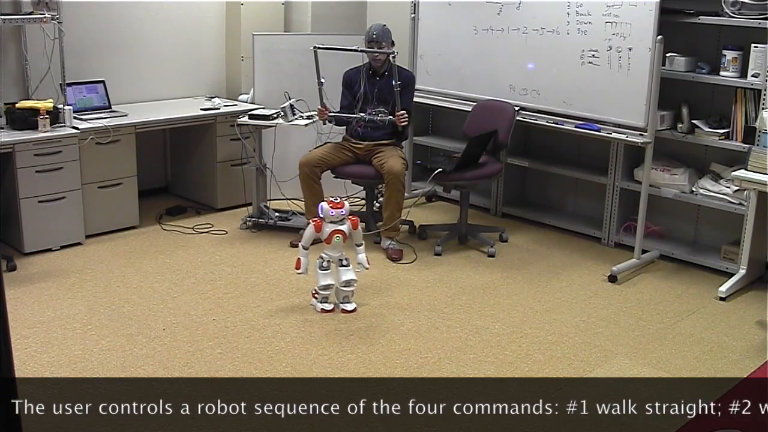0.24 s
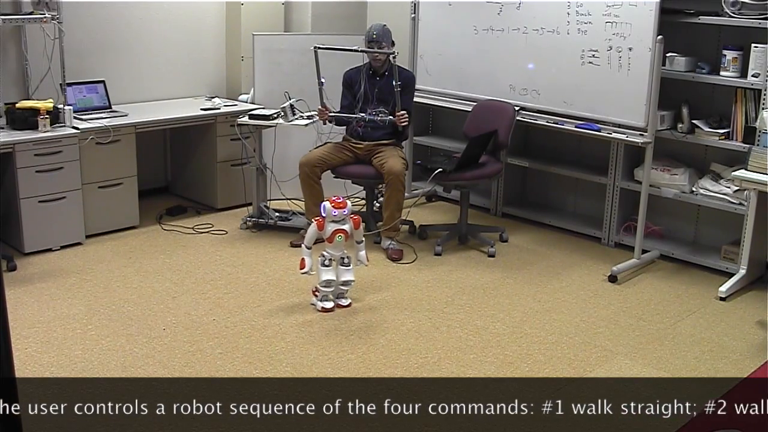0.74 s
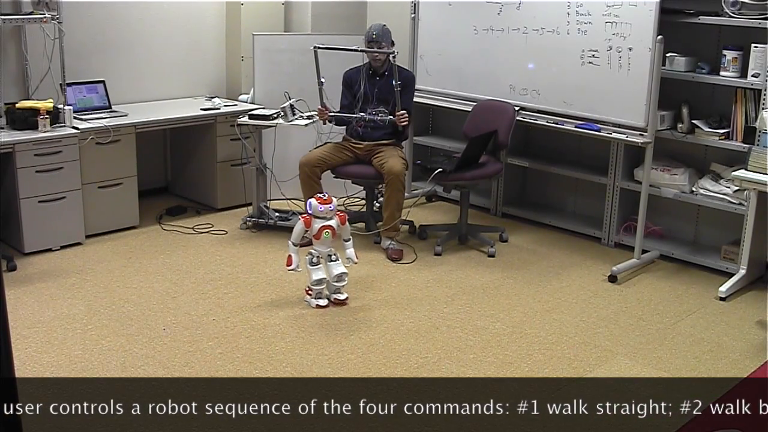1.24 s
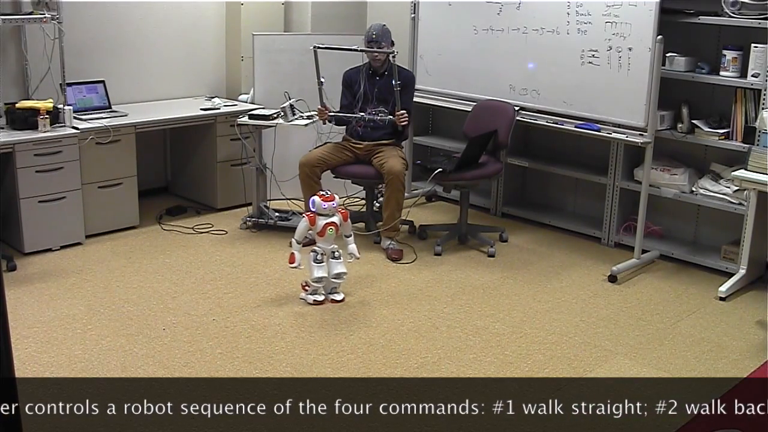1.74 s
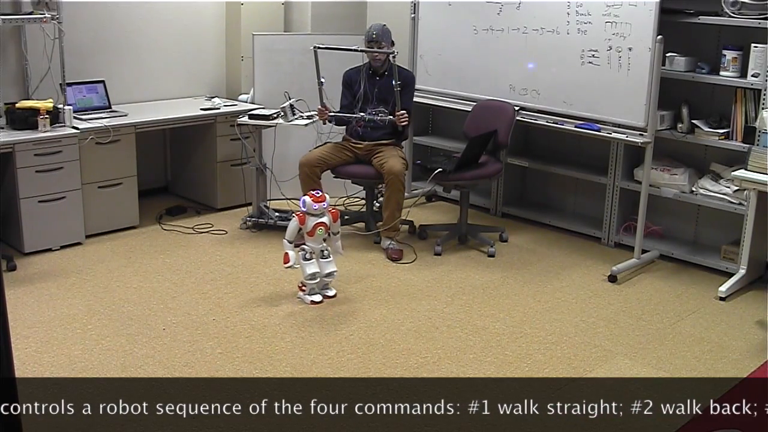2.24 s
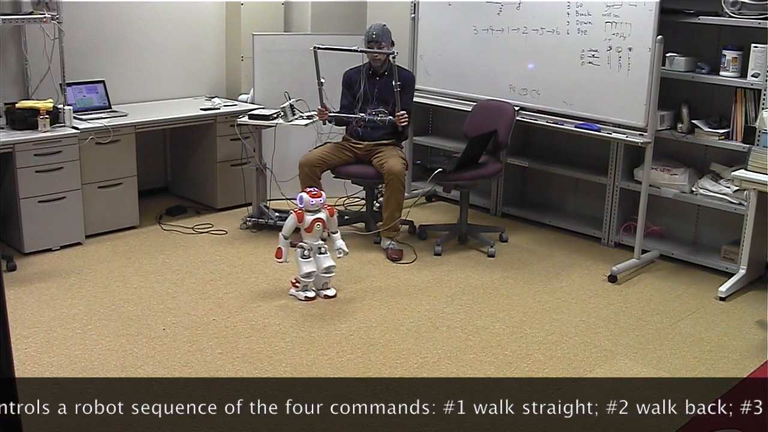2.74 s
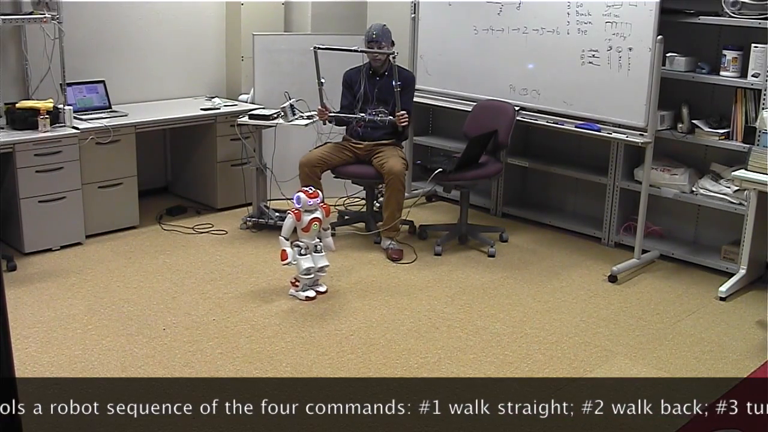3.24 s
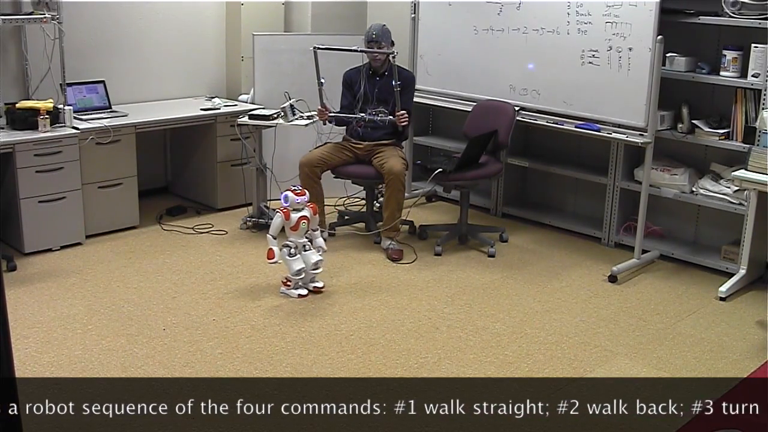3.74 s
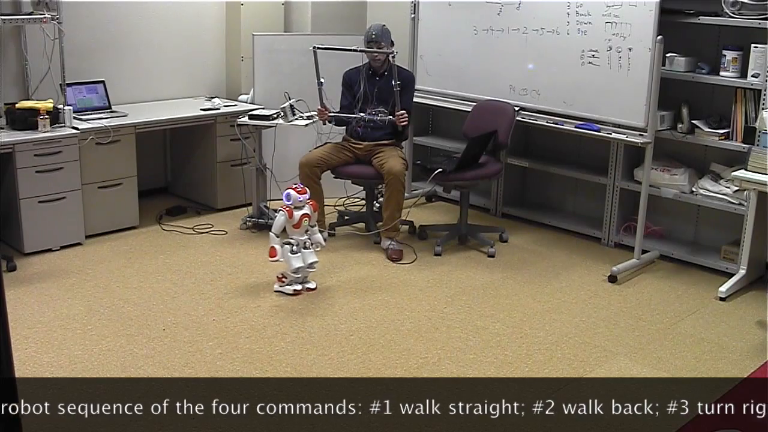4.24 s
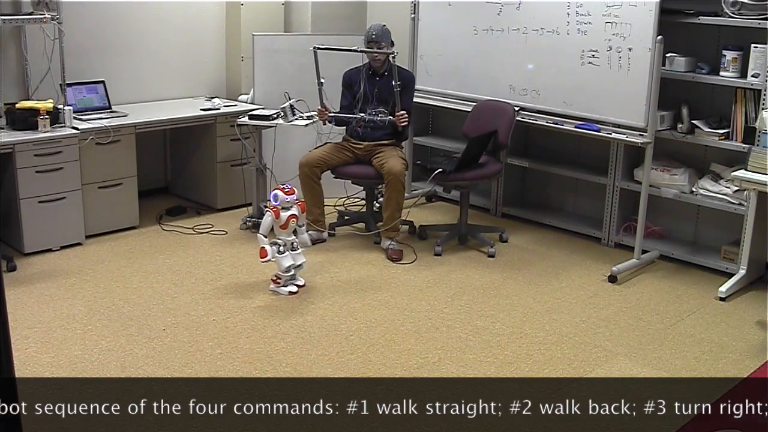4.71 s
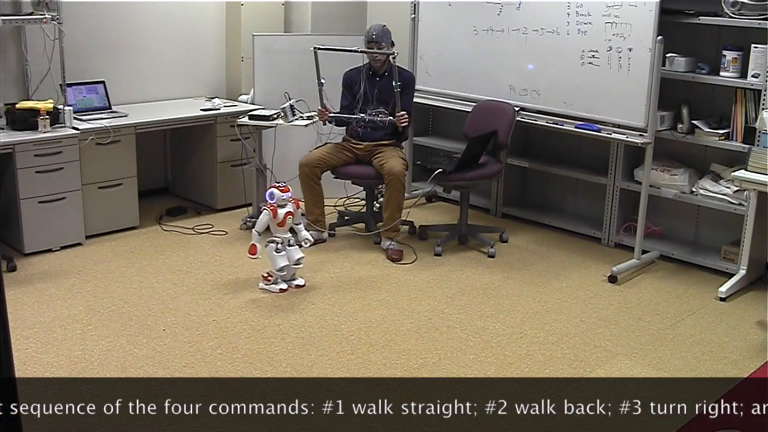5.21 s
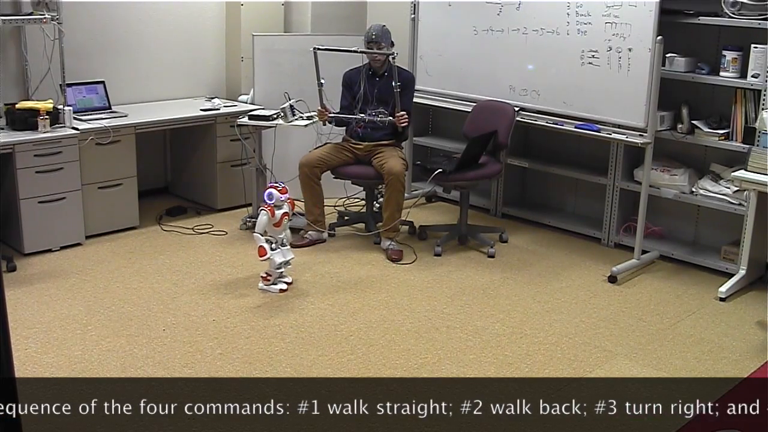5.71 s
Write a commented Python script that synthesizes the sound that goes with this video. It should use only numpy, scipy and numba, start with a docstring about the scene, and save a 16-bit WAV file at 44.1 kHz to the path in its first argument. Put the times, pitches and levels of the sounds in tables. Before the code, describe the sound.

Busy, dry gear noise from a toy-sized walking robot: nasal plastic grinding, irregular clacks and rattles, quick thin whines on each leg swing, then clunks and soft thuds as feet settle. The pattern repeats roughly every 0.8 seconds and is still going at the end. Small damped room, quiet background hiss, almost mono pickup with the very top cut.

```python
"""Furnished room, hard floor: a small plastic humanoid robot shuffles along.
Random tooth contacts through shell and gear resonances make its grind, jolts, squeals and whirs.
Two meshing tones whine on the swings; swept rings clunk, high noise scuffs, floor modes thud.
Noise tails make the room, coloured noise the air; the recorder rides its gain, notches out 150 Hz
and all its multiples and cuts the top."""
import sys
import numpy as np
from scipy import signal
from scipy.fft import rfft, irfft, next_fast_len
from scipy.io import wavfile
from scipy.ndimage import uniform_filter1d
from numba import njit

SR = 44100
rng = np.random.default_rng(int(sys.argv[2]) if len(sys.argv) > 2 else 0)


def store_wav(level_fs):
    """Save 16-bit WAV to argv[1]."""
    pcm = np.round(np.clip(np.atleast_2d(level_fs), -1, 1) * 32767)
    wavfile.write(sys.argv[1], SR, pcm.T.astype(np.int16))


N = 263277

# All levels are relative, ahead of mix and gain control.
# strides: (swing start [s], hip motor [dB], knee motor [dB], effort up to swing end [dB], effort after [dB])
STRIDES = [(-0.177, -60, -60, 2, -11), (0.667, -51, -52, -2, -0.5), (1.514, -51.5, -59, -1, -3),
           (2.345, -52.5, -54, -3.5, -10), (3.191, -54.5, -54, -2, -8.5), (4.022, -49, -55.5, -4, -5.5),
           (4.86, -51.5, -52, 2, -16), (5.7, -58, -55, -5, -11)]
# joints at work in one stride: (time from swing start [s], grind [dB], brightness [dB],
# strained shell resonance [Hz])
GAIT = [(-.31, -63.5, -7, 1450), (-.28, -45, -3.5, 1500), (-.19, -50, -28, 1400), (-.12, -50.5, -1, 1910),
        (-.04, -45, -6.5, 1250), (0.088, -63.5, -38, 1250), (0.179, -39.5, -35.5, 1600),
        (0.331, -70, 19.5, 1110), (0.422, -56, -22, 1070), (.49, -100.5, 22, 1350)]
SWING_END_S = 0.12
# gear jolts: (time [s], level [dB], hiss [dB], ring [Hz], hold [s], rise [s], upper ring [Hz],
# upper ring level [dB])
JOLTS = [(0.0, -31, -22, 1780, 0.004, 0.00039, 1800, -26),
         (0.135, -31, 4.5, 1413, 0.016, 0.0081, 3000, -29),
         (0.361, -43, 11.5, 1560, 0.0044, 0.0023, 2930, -3),
         (0.418, -36.5, -20, 1480, 0.013, 0.0025, 2980, -18),
         (0.532, -37.5, -24, 2026, 0.043, 0.016, 2000, -18.5),
         (0.657, -25.5, -17, 1085, 0.0053, 0.0018, 2970, -30),
         (0.668, -37, -47, 950, 0.0073, 0.0019, 2950, -30),
         (0.788, -29, -7, 1003, 0.031, 0.026, 3250, -18.5),
         (0.853, -24.5, -46, 1153, 0.022, 0.0027, 2940, -58),
         (0.944, -28, -34, 1230, 0.0061, 0.0029, 1990, -25),
         (0.978, -26, -19, 1130, 0.024, 0.0025, 1930, -26.5),
         (1.036, -36, -10, 1134, 0.055, 0.002, 2620, -34),
         (1.2, -42.5, 24.5, 1470, 0.0059, 0.0072, 2630, 0),
         (1.222, -28.5, -9.5, 1297, 0.014, 0.0028, 3030, -19),
         (1.339, -37, 5, 1670, 0.0082, 0.0016, 2600, -24), (1.367, -33, -22, 1650, 0.05, 0.0025, 2000, -21),
         (1.42, -29, 3, 1640, 0.014, 0.0088, 2120, -34), (1.487, -29, -25, 1100, 0.016, 0.0025, 2030, -40),
         (1.618, -36, 2.5, 1094, 0.052, 0.034, 3650, -36),
         (1.695, -19, 6, 1120, 0.0063, 0.0032, 2605, -11.5),
         (1.72, -12.5, -8, 1125, 0.0071, 0.0026, 2510, -22),
         (1.809, -31.5, -9.5, 1030, 0.037, 0.0068, 2000, -9.5),
         (2.049, -23, -3, 1664, 0.024, 0.003, 3680, -16.5),
         (2.333, -36, -38, 1160, 0.016, 0.0027, 2180, -39),
         (2.474, -39, -35, 1110, 0.009, 0.003, 2070, -36),
         (2.484, -25.5, -10, 1965, 0.036, 0.0032, 2080, -42),
         (2.516, -20.5, -3.5, 1112, 0.021, 0.005, 2680, -21), (2.626, -47, 6, 1890, 0.016, 0.01, 2050, -16),
         (2.662, -20, -10, 1187, 0.029, 0.00059, 2580, -22),
         (2.724, -33, -37, 1570, 0.0091, 0.0028, 2610, -53),
         (2.891, -27, -6, 1710, 0.018, 0.0028, 1990, -16),
         (2.942, -33.5, -19, 1266, 0.0047, 0.0025, 2110, -20),
         (3.03, -49.5, 10, 1780, 0.027, 0.012, 3680, -18),
         (3.093, -24, -15.5, 1104, 0.024, 0.0021, 2980, -27),
         (3.166, -28, -59, 1250, 0.011, 0.0014, 3050, -55),
         (3.304, -28.5, -29, 1121, 0.042, 0.021, 3100, -22),
         (3.333, -35.5, 7.5, 1490, 0.0024, 0.0024, 3100, -18),
         (3.468, -36, -27, 1896, 0.0058, 0.0025, 3100, -31),
         (3.511, -34.5, -33, 1133, 0.074, 0.0073, 2730, -44),
         (3.7315, -32.5, -14, 1670, 0.0033, 0.0025, 3550, -32),
         (3.776, -42.5, -11, 1720, 0.012, 0.0025, 2050, -20),
         (3.88, -39.5, -23, 1780, 0.028, 0.0025, 3560, -23),
         (3.951, -13, -21, 1647, 0.015, 0.0066, 2300, -31),
         (4.201, -20.5, -0.5, 1160, 0.0072, 0.0021, 2480, -17),
         (4.274, -15.5, -13, 1172, 0.0074, 0.0038, 2500, -19.5),
         (4.339, -32.5, -11, 1190, 0.041, 0.0028, 2140, -12),
         (4.671, -28.5, -1.5, 1678, 0.045, 0.0058, 2640, -32),
         (4.772, -24, -6.5, 1170, 0.024, 0.0035, 2850, -41),
         (4.985, -31.5, -11, 1070, 0.035, 0.0065, 2550, -23),
         (5.107, -33, -20, 1103, 0.04, 0.002, 2040, -15),
         (5.192, -24.5, -27.5, 1126, 0.028, 0.002, 2440, -22),
         (5.25, -40, -25, 1100, 0.0071, 0.0022, 2050, -49),
         (5.399, -44, 13.5, 1680, 0.019, 0.0043, 3140, -5.5),
         (5.424, -39.5, 2, 1450, 0.035, 0.002, 1930, -33), (5.47, -38, -42, 1520, 0.019, 0.0025, 2800, -19),
         (5.616, -29.5, -5, 1340, 0.02, 0.0029, 2700, -29), (5.64, -34, 4, 1225, 0.019, 0.0023, 2750, -6.5),
         (5.845, -25, -14, 1136, 0.0063, 0.0019, 2600, -35),
         (5.916, -33, -42, 1103, 0.016, 0.0027, 2570, -33),
         (5.936, -19, -43, 1185, 0.0046, 0.0021, 2560, -25)]
JOLT_T60_S, FIRST_DROP_DB, FIRST_DROP_S = 0.22, 2.5, 0.015   # falls fast first, then trails off
RING_WIDTH_HZ, UPPER_RING_WIDTH_HZ = 45, 200
BODY_DB_PER_HISS_DB = 0.51   # a dull jolt is mostly its ring
HISS_RISE_PER_HOLD = 0.5
FIZZ_DB, FIZZ_EXTRA_DROP = -8.5, 3.3   # extra dB per dB of jolt drop
RATTLE_DB, RATTLE_HZ = 1.8, 130
# motor in one swing: (time from swing start [s], mesh pitch [Hz], tone [dB], overtone base [dB])
HIP_RUN = [(0, 3020, -18, -6), (.019, 3095, 8, 3), (.045, 3105, 2, -3), (.075, 3075, -5, -11),
           (.095, 3040, -22, -30)]
KNEE_RUN = [(.07, 3030, -2, -4), (.095, 2945, -4, -6), (.125, 2890, -9, -10)]
# motor overtones: (multiple [1], level [dB])
HIP_OVERTONES = [(2, -16), (3, -7), (4, -27)]
KNEE_OVERTONES = [(3, -7), (4, -24)]
# rough squeal of a loaded joint: (start [s], start pitch [Hz], end level [dB])
SQUEALS = [(0.522, 3990, -51), (1.36, 4300, -53), (1.612, 3800, -64), (2.213, 4120, -53), (3.04, 4350, -65),
           (3.451, 3940, -58.5), (3.729, 5040, -63), (3.861, 5130, -57), (4.11, 5300, -62),
           (4.562, 5200, -60.5), (5.02, 4620, -63), (5.55, 3920, -56)]
SQUEAL_S, SQUEAL_SWELL_DB, SQUEAL_PITCH_RISE = 0.081, 4.5, 0.06   # pitch rise as a share
SQUEAL_RASP_RATIO, SQUEAL_RASP_DB = 1.31, -7   # second gear rasps above the squeal
# gear train whirs through the shell: (start [s], length [s], from [Hz], to [Hz], level [dB])
WHIRS = [(0.376, 0.21, 1630, 1490, -53), (0.542, 0.094, 2060, 2070, -62), (0.648, 0.07, 1440, 900, -49),
         (1.272, 0.12, 1370, 1740, -48.5), (2.604, 0.028, 1690, 2000, -56),
         (2.912, 0.096, 1340, 1280, -45.5), (4.339, 0.09, 1150, 1090, -45.5),
         (4.618, 0.052, 1200, 1400, -48), (4.715, 0.089, 665, 720, -61), (5.422, 0.077, 1360, 1400, -49.5),
         (5.653, 0.078, 1110, 965, -42.5)]
# thin hiss of a fast pinion: (start [s], length [s], from [Hz], to [Hz], level [dB])
PINIONS = [(0.494, 0.091, 11400, 11300, -72), (0.586, 0.026, 9000, 9000, -73),
           (3.453, 0.035, 10900, 11100, -76)]
# hollow clunks as a limb settles: (time [s], level [dB], starting ring [Hz])
CLUNKS = [(0.149, -32.5, 916), (0.667, -47, 960), (1.437, -32, 820), (2.341, -36, 913), (3.025, -49, 557),
          (3.177, -30, 940), (3.956, -27.5, 914), (4.801, -27.5, 930), (4.86, -36, 580), (5.205, -33, 795),
          (5.64, -26.5, 1080), (5.708, -35, 900)]
CLUNK_T60_S = 0.2
# sole scuffs off the floor: (time [s], level [dB])
SCUFFS = [(.3564, -38), (1.197, -35), (2.045, -24), (3.722, -45), (3.7933, -39), (4.525, -26.5), (5.4, -31)]
SCUFF_T60_S = 0.13
# footfalls, each starting 20 ms ahead of its time: (time [s], level [dB])
FOOTFALLS = [(0.276, -50), (0.39, -47.5), (0.602, -37), (0.696, -45.5), (1.033, -43.5), (1.24, -44),
             (1.426, -34), (1.544, -52), (1.636, -50.5), (1.832, -34.5), (1.999, -52), (2.074, -44),
             (2.286, -42), (2.334, -48), (2.717, -42.5), (3.11, -28.5), (3.285, -53.5), (3.354, -62),
             (3.546, -54), (3.961, -29.5), (4.363, -42.5), (4.787, -30), (4.861, -64), (5.207, -45.5),
             (5.424, -45), (5.539, -55), (5.635, -36), (5.746, -66), (5.859, -57)]
# floor modes: (nominal pitch [Hz], mean level [dB])
FLOOR_MODES = [(105, -8), (137, 5), (168, -3.5), (200, -10), (245, -9.5), (340, -23)]
FLOOR_PITCH_SPREAD = 0.05   # share, per footfall
THUD_LOW_HZ, THUD_HIGH_HZ, THUD_DB, THUD_T60_S = 83, 363, -9.5, 0.22
# narrow shell resonances: (centre [Hz], width [Hz], level [dB])
SHELL = [(704, 9.3, -6), (1130, 8.3, 7), (1630, 430, -6.5), (2082, 102, -1), (2745, 96, -8.5),
         (3380, 95, -12), (3570, 96, -19), (4240, 360, -17.5), (5640, 16, -11.5), (8330, 31, -18)]
# broad colour of the shell: (frequency [Hz], level [dB])
SHELL_BODY = [(180, -102), (300, -62), (684, -11), (897, -25), (1120, 7), (1370, -2), (2680, -16.5),
              (5000, -24.5), (6500, -29), (11000, -120)]
# colour of the gear teeth: (frequency [Hz], level [dB])
TEETH = [(1470, -45), (2500, -2), (3150, 1.5), (4510, -7.5), (5180, -4), (8940, -12.5), (13600, -44),
         (15600, -69)]
# room decay: (frequency [Hz], T60 [s])
ROOM_DECAY = [(150, 0.45), (1000, 0.078), (4000, 0.032), (12000, 0.002)]
# colour of the echo's width: (frequency [Hz], level [dB])
SIDE_TINT = [(100, 21), (500, 11), (1000, 6), (4000, 17), (8000, 13), (13000, 29)]
# colour of the air noise: (frequency [Hz], level [dB])
AIR = [(18, -64), (30, -46), (117, -4), (300, -16.5), (548, -2), (879, -9), (1270, -8), (3010, -10),
       (8350, -34.5), (14500, -42), (15600, -55)]
ROOM_DB, WIDTH_DB, AIR_DB, AIR_SIDE_DB = -11.5, -33.5, -59, -19.5
# channel balance: (frequency [Hz], left minus right [dB])
LEAN = [(60, -.2), (240, -.3), (950, 1.1), (3770, 1.2), (9000, .2), (15000, -.5)]
NOTCH_LAG_SAMPLES = SR // 150
NOTCH_FEEDBACK = 0.45
CUTOFF_HZ = 15800


def grind(body, teeth, clicks):
    """Running gears repeat one pattern every stride: shell hums, loaded limb resonates, teeth hiss."""
    rows = []
    for start_s, _, _, before_db, after_db in STRIDES:
        for s, db, bright_db, hz in GAIT:
            effort_db = before_db if s < SWING_END_S else after_db
            rows.append((start_s + s, db + effort_db, bright_db, hz))
    level_db, bright_db, ring_hz = in_time(rows)
    limb = rms_one(glide(clicks, ring_hz, pole_radius(110), SR))
    uneven = amp(level_db + 2.0 * drift(rate_hz=100))
    return uneven * (amp(-4.5) * body + amp(-11.0) * limb + amp(bright_db) * teeth)


def jolts(body, teeth, clicks):
    """A gear train takes up its slack: a rattle rises, holds and dies away, the highest hiss first."""
    hiss = rms_one(butter(teeth, 3, 8000, "low"))
    fizz = rms_one(butter(teeth, 3, 8000, "high"))
    out, t = np.zeros(N + SR), np.arange(SR // 4) / SR
    body = steadied(body)
    for s, db, hiss_db, low_hz, hold_s, rise_s, high_hz, high_db in JOLTS:
        span = slice(round(s * SR), round(s * SR) + len(t))
        run_in = clicks[span.start:span.stop + SR // 20]   # lets the rings build up first
        low = steadied(resonate(run_in, low_hz, RING_WIDTH_HZ)[-len(t):])
        high = steadied(resonate(run_in, high_hz, UPPER_RING_WIDTH_HZ)[-len(t):])

        after_s = np.maximum(t - hold_s, 0)
        drop_db = 60 * after_s / JOLT_T60_S + FIRST_DROP_DB * (1 - np.exp(-after_s / FIRST_DROP_S))
        fade = swell(t, rise_s + 1e-4) * amp(db - drop_db)

        treble = hiss[span] + amp(FIZZ_DB - FIZZ_EXTRA_DROP * drop_db) * fizz[span]
        treble_gain = amp(hiss_db - 12.5 - 0.5 * drop_db)
        treble_gain = treble_gain * swell(t, HISS_RISE_PER_HOLD * hold_s + 1e-4)
        hum = amp(BODY_DB_PER_HISS_DB * hiss_db - 9.0) * body[span]
        out[span] += fade * (hum + amp(-13.0) * low + amp(high_db) * high + treble_gain * treble)
    return out[:N] * amp(RATTLE_DB * drift(RATTLE_HZ))   # contacts come in clusters


def whine(run, overtones, column, waver, beat_db):
    """Tooth meshing tone with overtones on every swing after the first; speed wavers, level beats."""
    swings = []
    for row in STRIDES[1:]:
        motor_db = row[column]
        swings.append([(row[0] + s, hz, motor_db + tone, motor_db + over) for s, hz, tone, over in run])
    hz, tone_db, over_db = event_curves(swings)
    phase = 2 * np.pi * np.cumsum(hz * (1 + waver * drift(rate_hz=136))) / SR
    out = amp(tone_db + beat_db * drift(rate_hz=80)) * np.sin(phase)
    for k, db in overtones:
        out = out + amp(over_db + db + beat_db * drift(rate_hz=110)) * np.sin(k * phase)
    return out


def squeal(clicks, width_hz):
    """Uneven tooth contacts through a steep, wavering resonance, swelling and breaking up."""
    hz, db = event_curves([[(s, f, level_db - SQUEAL_SWELL_DB),
                            (s + SQUEAL_S, f * (1 + SQUEAL_PITCH_RISE), level_db)]
                           for s, f, level_db in SQUEALS])
    hz = hz * (1 + 0.025 * drift(rate_hz=25))
    out = 0
    for ratio, ratio_db in ((1, 0), (SQUEAL_RASP_RATIO, SQUEAL_RASP_DB)):
        gain = amp(db + ratio_db + 2.96 * drift(rate_hz=30))
        out = out + gain * steep_glide(clicks, ratio * hz, width_hz)
    return out


def whir(clicks, rows, width_hz, uneven_db):
    """Tooth contacts through a steep resonance that follows the gear speed."""
    hz, db = event_curves([[(s, from_hz, level_db), (s + length_s, to_hz, level_db)]
                           for s, length_s, from_hz, to_hz, level_db in rows])
    return amp(db + uneven_db * drift(rate_hz=85)) * steep_glide(clicks, hz, width_hz)


def clunks(clicks):
    """Loose parts knock about in the hollow limb, the ring sinking as the limb settles."""
    out, t = np.zeros(N + SR), np.arange(SR // 4) / SR
    for s, db, hz in CLUNKS:
        span = slice(round(s * SR), round(s * SR) + len(t))
        knocks = clicks[span]
        ring = rms_one(glide(knocks, hz * np.exp(-1.5 * t), pole_radius(110), SR))
        hollow = resonate(knocks, hz=592, width_hz=146)
        hollow = rms_one(hollow + amp(-9.0) * resonate(knocks, hz=288, width_hz=44))
        fade = swell(t, 0.0006) * amp(db - 11.5 - 60 * t / CLUNK_T60_S)
        out[span] += fade * (ring + amp(-4.5) * hollow)
    return out[:N]


def scuffs():
    """Plastic scratches the floor briefly: high noise starts sharply and dies away."""
    t, fade = np.arange(N) / SR, 0
    for s, db in SCUFFS:
        after_s = np.maximum(t - s - 0.015, 0)   # holds 15 ms
        fade = fade + (t > s) * amp(db - 24.5 - 60 * after_s / SCUFF_T60_S)
    scratch = butter(tooth_clicks(per_s=3400, spread_db=-3.0), 2, [7000, 13500], "band")
    return fade * rms_one(scratch)


def footfalls():
    """A sole lands over hundredths of a second: floor modes of uneven strength over a dull rumble."""
    out, t = np.zeros(N + SR), np.arange(SR // 2) / SR
    rumble = rms_one(butter(rng.standard_normal(N + SR), 2, [THUD_LOW_HZ, THUD_HIGH_HZ], "band"))
    chance = rng.standard_normal((len(FOOTFALLS), len(FLOOR_MODES)))
    for (s, db), row in zip(FOOTFALLS, chance):
        pitch = 1 + FLOOR_PITCH_SPREAD * row[-1]
        ring = 0
        for (hz, mode_db), c in zip(FLOOR_MODES, row):
            ring = ring + amp(mode_db + 1.3 * c) * np.sin(2 * np.pi * hz * pitch * t + c)
        at = round((s - 0.02) * SR)
        span = slice(at, at + len(t))
        thud = amp(4.0 - 60 * t / 0.16) * ring
        thud = thud + amp(THUD_DB - 60 * t / THUD_T60_S) * rumble[span]
        out[span] += amp(db) * swell(t, 0.022) ** 2 * thud
    return butter(out[:N], 3, 80, "high")


def shell(clicks, peaks_db):
    """Hollow plastic body: a broad colour with narrow resonances on it."""
    rings = 0
    for k, (hz, width_hz, db) in enumerate(SHELL):
        rings = rings + (-1) ** k * amp(db) * resonate(clicks, hz, width_hz)
    return colour(clicks, SHELL_BODY) + amp(peaks_db) * rings


def gear_rings(clicks, flicker_db, rate_hz, width, wander):
    """Small gears and shafts: narrow high resonances wander with load, each excited now and then."""
    pitches_hz = np.geomspace(2600, 13500, 22) * amp(rng.normal(0, 0.2, 22))
    load, out = drift(rate_hz=1.5), 0
    for k, hz in enumerate(pitches_hz):
        r = pole_radius(width * hz)
        own_load = np.roll(load, k * N // len(pitches_hz))
        ring = (1 - r * r) * glide(clicks, hz * (1 + wander * own_load), r, SR)
        out = out + amp(at_hz(TEETH, hz) + flicker_db * drift(rate_hz)) * ring
    return out


def tooth_clicks(per_s, spread_db):
    """Gear teeth meet at random moments with uneven force."""
    sizes = amp(spread_db * np.minimum(rng.exponential(1, N), 5)) * rng.choice([-1, 1], N)
    return rms_one(sizes * (rng.random(N) < per_s / SR))


def patchy(x, patch_db, rate_hz):
    """Half-octave bands swell and fade on their own as loads shift between gears."""
    size = next_fast_len(N)
    hz, spectrum, out = np.fft.rfftfreq(size, 1 / SR), rfft(x, size), 0
    band_position = 2 * np.log2(np.clip(hz, 707, 16000) / 1000)
    for k in np.arange(-1, 9):
        share = np.clip(1 - abs(band_position - k), 0, 1)
        out = out + irfft(spectrum * share, size)[:N] * amp(patch_db * drift(rate_hz))
    return out


def room(x):
    """Diffuse tail: octave noise bands die at their own rates; returns mid and side."""
    t, tail = np.arange(SR // 2) / SR, 0
    for hz in 60 * 2 ** np.arange(8):
        t60_s = at_hz(ROOM_DECAY, 1.4 * hz)
        noise = butter(rng.standard_normal((2, len(t))), 2, [hz, 2 * hz], "band")
        tail = tail + noise * amp(-60 * t / t60_s) / np.sqrt(t60_s)
    side_fade = amp(-60 * t / 0.065)   # width comes mostly from early echoes
    tail = tail * (t > 0.002) * [np.ones(len(t)), side_fade]
    tail = tail / np.sqrt(np.sum(tail ** 2, axis=1, keepdims=True))
    return [signal.fftconvolve(x, h)[:N] for h in tail]


def air():
    """Steady coloured noise with a slight level drift; returns mid and side."""
    level = amp(AIR_DB + 1.2 * drift(rate_hz=4))
    return level * rms_one(colour(rng.standard_normal((2, N)), AIR))


def amp(db):
    """dB to gain."""
    return np.exp(np.asarray(db) * (np.log(10) / 20))


def rms_one(x):
    """Scale to rms 1."""
    return x / np.sqrt(np.mean(x ** 2) + 1e-20)


def steadied(x):
    """Take out most of the slow swell of a ringing noise; rms 1."""
    power = uniform_filter1d(x ** 2, size=SR // 60)
    return rms_one(x / (power + 0.05 * np.mean(x ** 2)) ** 0.35)


def swell(t, rise_s):
    """Exponential approach from 0 to 1."""
    return 1 - np.exp(-t / rise_s)


def drift(rate_hz):
    """Slow chance of spread 1, drawn at every 16th sample."""
    r = np.exp(-32 * np.pi * rate_hz / SR)
    slow = signal.lfilter([1], [1, -2 * r, r * r], rng.standard_normal(N // 16 + 3002))[3000:]
    return np.interp(np.arange(N) / 16, np.arange(len(slow)), rms_one(slow))


def in_time(rows):
    """Columns of a curve at every sample."""
    s, *columns = np.transpose(rows)
    return [np.interp(np.arange(N) / SR, s, c) for c in columns]


def event_curves(events):
    """Pitch and levels of all events in one curve, hushed in between by 15 ms ramps."""
    rows = []
    for event in events:
        first, last = event[0], event[-1]
        hush_db = [-95] * (len(first) - 2)
        rows += [(first[0] - 0.015, first[1], *hush_db), *event, (last[0] + 0.015, last[1], *hush_db)]
    return in_time(rows)


def at_hz(points, hz):
    """A spectrum read on a log-frequency axis."""
    points = np.array(points)
    return np.interp(np.log(hz + 1), np.log(points[:, 0]), points[:, 1])


def colour(x, points):
    """Shape a signal by a spectrum in dB."""
    size = next_fast_len(x.shape[-1])
    hz = np.fft.rfftfreq(size, 1 / SR)
    return irfft(rfft(x, size) * amp(at_hz(points, hz)), size)[..., :x.shape[-1]]


def butter(x, order, hz, kind):
    """Butterworth filter."""
    return signal.sosfilt(signal.butter(order, hz, kind, fs=SR, output="sos"), x)


def pole_radius(width_hz):
    """Pole radius of a resonance of this width."""
    return np.exp(-np.pi * width_hz / SR)


def resonate(x, hz, width_hz):
    """Two-pole resonance, gain 1 on top."""
    r = pole_radius(width_hz)
    poles = [1, -2 * r * np.cos(2 * np.pi * hz / SR), r * r]
    return signal.lfilter(np.array([1, 0, -1]) * (1 - r * r) / 2, poles, x)


@njit
def glide(x, hz, r, rate):
    """Resonance with a moving centre."""
    y = np.zeros(len(x))
    for i in range(2, len(x)):
        turn = 2 * r * np.cos(2 * np.pi * hz[i] / rate)
        y[i] = x[i] - x[i - 2] + turn * y[i - 1] - r * r * y[i - 2]
    return y


def steep_glide(x, hz, width_hz):
    """Moving resonance applied twice; rms 1."""
    r = pole_radius(width_hz)
    return rms_one(glide(glide(x, hz, r, SR), hz, r, SR))


def scene():
    """Robot, its echo in the room and the steady air noise."""
    clicks = tooth_clicks(per_s=2300, spread_db=3.5)
    body = rms_one(patchy(shell(clicks, peaks_db=7), patch_db=3.5, rate_hz=6))
    fine = tooth_clicks(per_s=4700, spread_db=0.5)
    rings = gear_rings(fine, flicker_db=7.5, rate_hz=33, width=0.041, wander=0.043)
    teeth = rms_one(colour(fine, TEETH)) + amp(8) * rms_one(rings)
    teeth = rms_one(patchy(teeth, patch_db=4, rate_hz=16))

    # reversed and offset copies serve as unrelated contacts
    clicks, other_body, other_teeth = (np.tile(x[::-1], 2) for x in (clicks, body, teeth))
    robot = grind(body, teeth, clicks[N // 2:][:N])
    robot += jolts(other_body, other_teeth, clicks[SR:])
    robot += whine(HIP_RUN, HIP_OVERTONES, column=1, waver=0.009, beat_db=4.5)
    robot += whine(KNEE_RUN, KNEE_OVERTONES, column=2, waver=0.009, beat_db=4.0)
    robot += squeal(clicks[N // 3:][:N], width_hz=430)
    robot += whir(clicks[N // 4:][:N], WHIRS, width_hz=204, uneven_db=2.0)
    robot += whir(np.roll(fine, N // 2), PINIONS, width_hz=420, uneven_db=2.0)
    robot += clunks(clicks[2 * SR:]) + scuffs() + footfalls()

    echo_mid, echo_side = room(robot)
    air_mid, air_side = air()
    mid = amp(0.5) * robot + amp(ROOM_DB) * echo_mid + air_mid
    side = amp(WIDTH_DB) * colour(echo_side, SIDE_TINT) + amp(AIR_SIDE_DB) * air_side
    left_lean = [(hz, db / 2) for hz, db in LEAN]
    right_lean = [(hz, -db / 2) for hz, db in LEAN]
    return np.array([colour(mid + side, left_lean), colour(mid - side, right_lean)])


def gain_control(x, knee_db, slope, release_db_s):
    """Loud moments turn the gain down at once; it creeps back afterwards."""
    level_db = 10 * np.log10(uniform_filter1d(np.mean(x ** 2, axis=0), size=441) + 1e-12)
    ramp_db = release_db_s * np.arange(N) / SR
    held_db = np.maximum.accumulate(level_db + ramp_db) - ramp_db
    cut_db = slope * np.maximum(held_db - knee_db, 0)
    return x * amp(-uniform_filter1d(cut_db, size=441))


def record(dry):
    """Gain control, comb of notches (sound minus itself 1/150 s earlier, fed back to narrow), top cut."""
    dry = gain_control(dry, knee_db=-38.0, slope=0.26, release_db_s=203)
    size = next_fast_len(N + SR)
    hz = np.fft.rfftfreq(size, 1 / SR)
    late = np.exp(-2j * np.pi * hz * NOTCH_LAG_SAMPLES / SR)
    comb = (1 - late) / (1 - NOTCH_FEEDBACK * late)
    comb = comb * np.sqrt((1 + NOTCH_FEEDBACK) / 2)   # keeps noise power
    notched = irfft(rfft(dry, size) * comb, size)[:, :N]
    return signal.sosfilt(signal.cheby2(16, 70, CUTOFF_HZ, fs=SR, output="sos"), notched)


dry = scene()
out = record(dry)
store_wav(out)
```